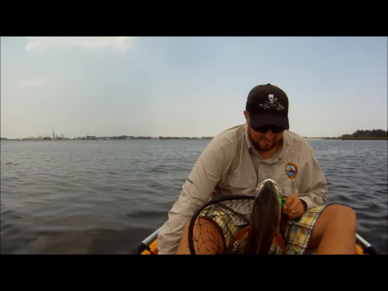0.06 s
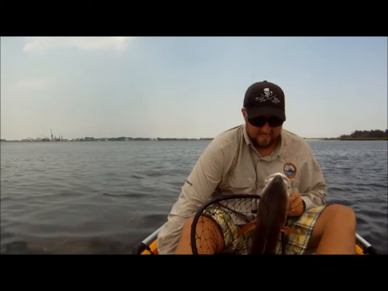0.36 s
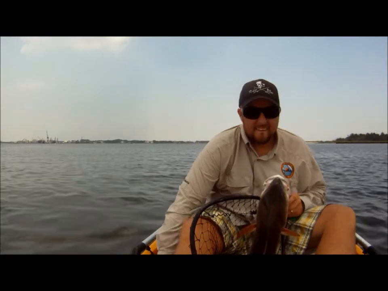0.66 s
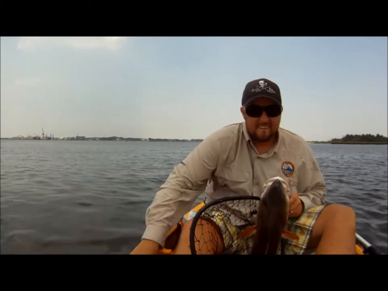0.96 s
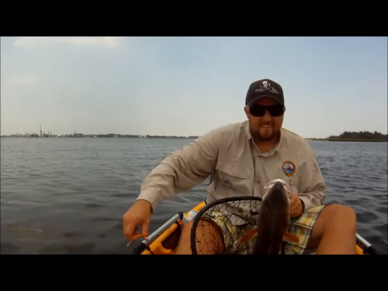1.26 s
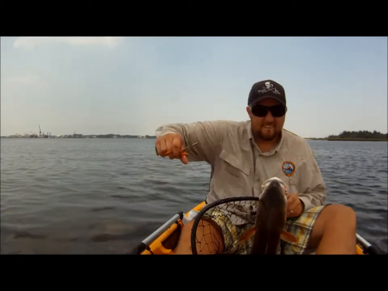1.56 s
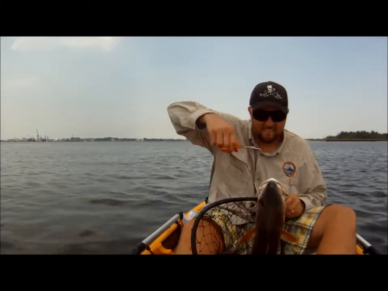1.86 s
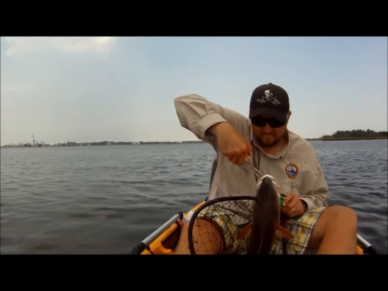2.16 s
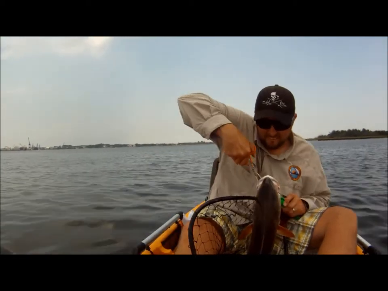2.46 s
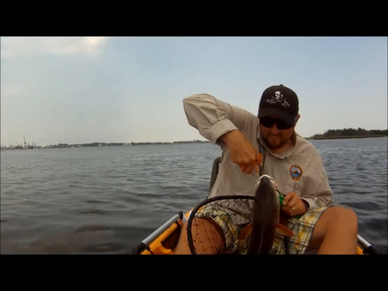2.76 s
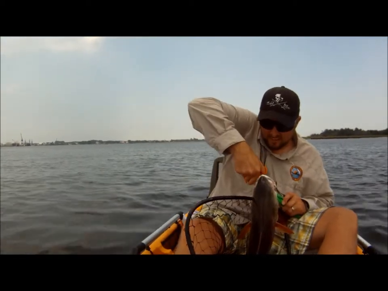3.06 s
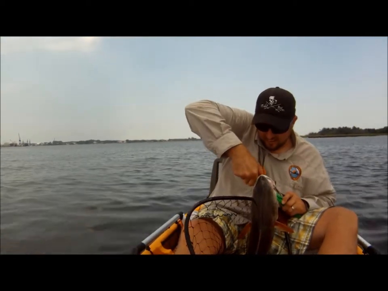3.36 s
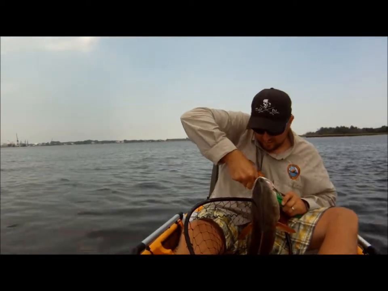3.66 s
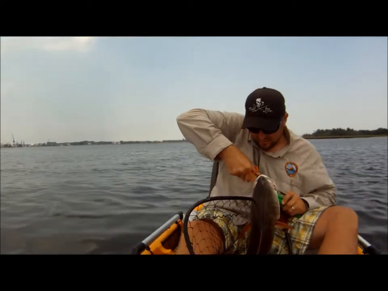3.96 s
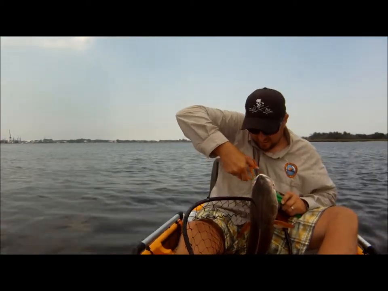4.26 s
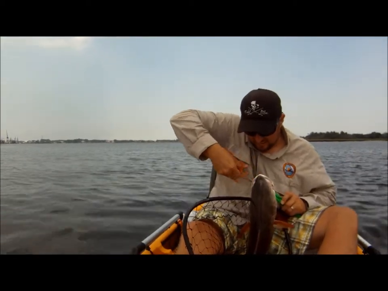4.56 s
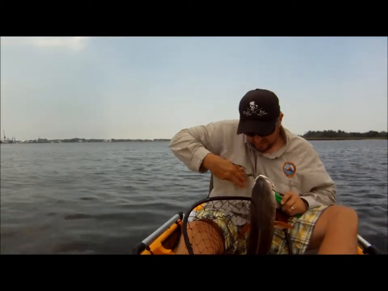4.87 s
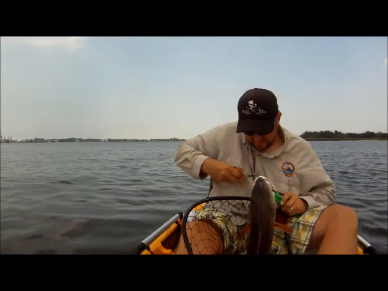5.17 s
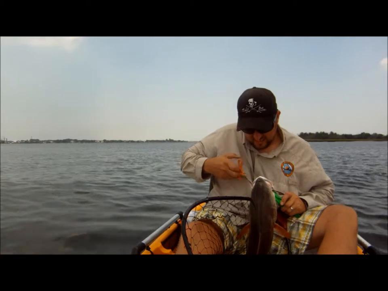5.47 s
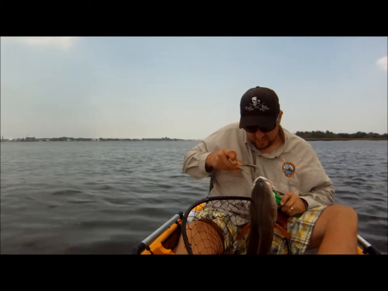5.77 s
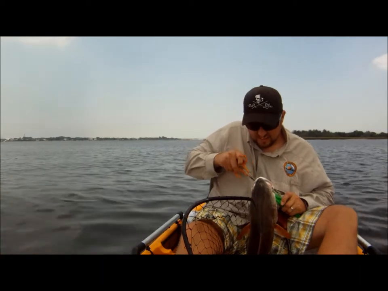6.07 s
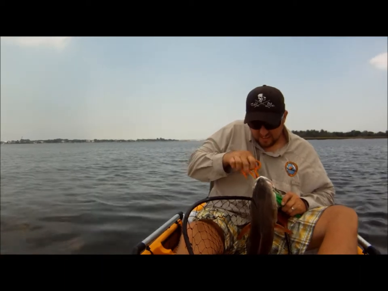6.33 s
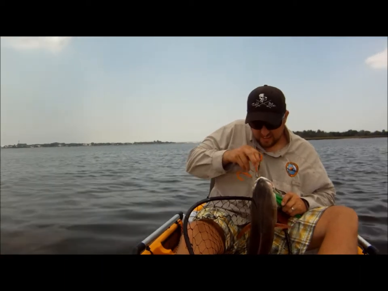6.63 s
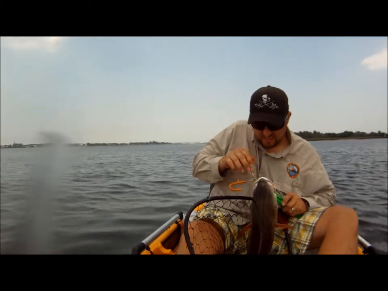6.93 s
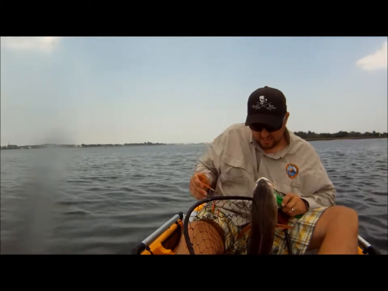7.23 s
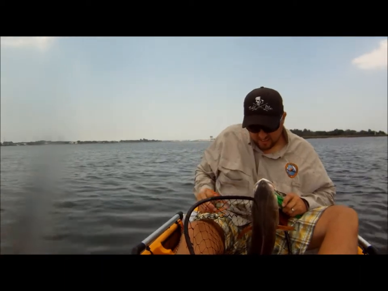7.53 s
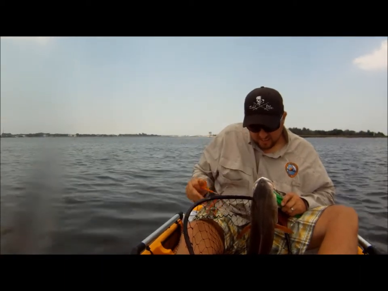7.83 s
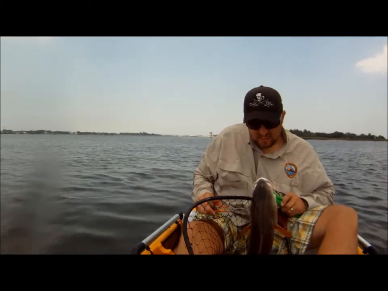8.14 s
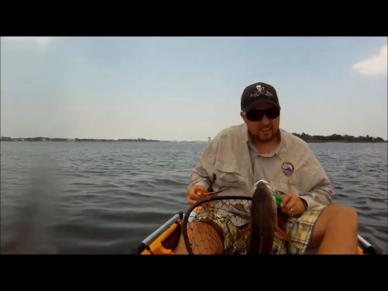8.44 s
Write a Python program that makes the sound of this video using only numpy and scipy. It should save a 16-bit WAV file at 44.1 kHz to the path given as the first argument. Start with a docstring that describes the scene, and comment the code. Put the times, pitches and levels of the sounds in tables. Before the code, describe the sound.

Low wind rumble and gently lapping water run throughout, with a faint rustle of wet net and sleeves close to the microphone. In the first second, gear scuffs dully against a plastic kayak, with thin scratches and brief swells of rumble. Sharp, hollow hull knocks and a tackle click cluster between 0.6 and 1.2 seconds, the loudest knock at 1 second. Soft bumps follow from about 2 to 3 seconds, among faint ticks of a hook being worked. A knock comes at 4.4 seconds and a sharp click at 4.8, then more small ticks. Two clicks and a strong knock land around 7.8 to 8 seconds, followed by soft bumps near 8.4. From about 1 second on, distant birds faintly trade quick trills, short falling notes and chirps. The handling sounds are dry, with a slightly glassy top.

```python
"""Open water, aboard a plastic kayak: a small camera's microphone sits close to an angler unhooking a fish.
Close up and dry, wet net rustles, gear scuffs and rocks the boat, soft bumps come through it,
the hollow hull knocks and tackle clicks. Wind rumbles and ripples lap underneath.
Farther off, birds trade two trilled phrases, with short falling notes between them and a distant chirp.
The camera holds each sample of a slow converter, which adds a glassy top."""
import sys
import numpy as np
from scipy import signal
from scipy.fft import rfft, irfft, next_fast_len
from scipy.io import wavfile
from scipy.ndimage import uniform_filter1d

SR = 44100
rng = np.random.default_rng(int(sys.argv[2]) if len(sys.argv) > 2 else 0)


def to_wav(s):
    """Save 16-bit WAV."""
    ch = np.atleast_2d(s).T  # columns
    pcm = np.round(np.clip(ch, -1, 1) * 32767)  # PCM
    wavfile.write(sys.argv[1], SR, pcm.astype(np.int16))


N = 379260

# Levels are relative within each table; ring_factor stretches a mode's t60_s.
# spectrum of wind and water: frequency_hz, level_db
AIR_SPECTRUM = [(15, -58), (25, -2.5), (76, 3), (143, -2), (183, -1.5), (230, -6.5), (637, -17.5),
                (764, -24), (1120, -37), (1440, -39), (1580, -29), (1760, -32), (2480, -49), (3330, -40),
                (5600, -41), (7280, -89), (12300, -120)]
# hollow hull ringing under the ripples: pitch_hz, width_hz, level_db
HULL_HUM = [(76, 38, -55.5), (175.1, 14, -53.5), (533, 109, -59), (1112, 53, -72)]
# rise and fall of the rustle of wet net and sleeves: time_s, level_db
RUSTLE_LEVELS = [(0.0, -58.5), (0.45, -59.5), (0.55, -65), (1.8, -65.5), (3.62, -65.5), (3.74, -66),
                 (4.14, -68), (4.43, -66), (4.81, -68), (5.53, -67.5), (5.8, -66.5), (6.25, -68.5),
                 (6.52, -64), (7.54, -69), (7.91, -66), (8.6, -66)]
# net, hook and line scratching: start_s, level_db, centre_hz, decay_s
LINE_SCRATCHES = [(0.061, -36.5, 1910, 0.0076), (0.096, -35, 2800, 0.003), (0.5708, -22, 2150, 0.0058),
                  (0.74, -33.5, 1960, 0.006), (2.055, -41.5, 1400, 0.0062), (2.101, -42.5, 591, 0.028),
                  (2.868, -45, 2610, 0.037), (3.828, -41.5, 2190, 0.0028), (8.29, -46, 2140, .006),
                  (8.472, -45, 2830, 0.006)]
# net and clothes scuffing the boat: start_s, level_db, centre_hz, decay_s
BOAT_SCUFFS = [(0.077, -20, 398, 0.0087), (0.093, -14, 191, 0.011), (0.115, -24, 214, 0.02),
               (0.197, -28, 338, .016), (0.455, -23, 590, 0.0085), (0.571, -23, 600, .008),
               (0.594, -16, 440, 0.01), (0.857, -26, 173, 0.011), (0.883, -16.5, 257, 0.012)]
# soft bumps through the boat: start_s, level_db
BOAT_BUMPS = [(0.276, -24), (1.152, -25), (1.915, -25.5), (2.473, -25.5), (2.523, -26), (2.83, -25.5),
              (3.059, -27.5), (8.352, -27.5), (8.412, -27), (8.475, -28.5)]
# knocks on the hull, the one at 0.808 s a plop of water against it, and clicks of hook, lure and grip: start_s,
# level_db, centre_hz, ring_factor
HULL_KNOCKS = [(0.5748, -10, 920, 1.15), (0.5945, -12, 430, 0.43), (0.808, -20.5, 920, 1.13),
               (1.0122, -0.5, 1026, 0.93), (1.0394, -17, 760, 0.89), (1.1892, -7, 1360, 0.66),
               (1.2096, -17.5, 1300, 1.1), (1.225, -22, 1160, 1.1), (4.4357, -13.5, 726, 0.93),
               (7.9222, -7.5, 1290, 0.71)]
TACKLE_CLICKS = [(0.8982, -12.5, 3460, 0.77), (1.1235, -37, 2500, .9), (1.6432, -38, 2250, 0.57),
                 (2.165, -34.5, 2920, 0.48), (2.3937, -41, 2140, 1), (3.021, -41, 2230, .9),
                 (3.6713, -38.5, 2990, .9), (4.795, -9, 3020, 0.93), (5.0544, -37, 2160, 1),
                 (5.0996, -28, 2140, 1), (5.879, -41, 2530, .9), (6.0008, -41, 3020, 1),
                 (6.5337, -33.5, 2700, 0.49), (6.6726, -36, 2200, .9), (6.7917, -36.5, 2300, 1),
                 (6.8745, -35.5, 2740, 1), (6.9357, -36, 1900, 1), (7.725, -35, 2400, 1),
                 (7.7744, -17, 3570, 0.55), (8.0196, -22.5, 3700, 0.87)]
# modes of the hull and of the tackle: pitch_hz, level_db, t60_s
HULL_MODES = [(440, -15, .05), (550, -15, .05), (625, -3, .058), (845, -10, .04), (965, -14, .04),
              (1135, 0, .034), (1545, -1, .019), (1880, -3, .011), (2120, -1, .011), (2400, 0, .012),
              (3700, -11, .01), (4700, -19, .009)]
TACKLE_MODES = [(1280, -9, .018), (1884, -9, .016), (2470, 2, .019), (2700, -4, .014), (3040, -1, .016),
                (3440, 0, .017), (3860, -4, .018), (4400, -8, .012), (4950, -7, .012)]
# spells of finger work at the hook: start_s, end_s
HOOK_SPELLS = [(2.05, 2.95), (3.1, 4.0), (5.9, 7.2)]
# a distant bird's repeated chirp: start_s, level_db
FAR_CHIRPS = [(0.95, -65), (3.8, -69), (4.985, -64), (5.135, -63.5), (6.12, -72), (6.93, -68), (7.075, -68),
              (7.265, -73)]
# short bird notes between the phrases: start_s, length_s, level_db, pitch_hz
BIRD_NOTES = [(1.82, .045, -50.5, 2780), (2.277, 0.035, -51.5, 2660), (2.514, 0.034, -51.5, 2040),
              (3.624, 0.03, -51, 2070), (4.05, 0.029, -54, 1950), (4.175, 0.04, -55.5, 1480),
              (5.116, 0.053, -51, 2220), (5.24, 0.043, -46, 1820), (8.094, .14, -55, 2770),
              (8.177, 0.063, -56, 2070)]
# course of each phrase: share_of_length, pitch_hz, level_db, trill_depth
LOW_PHRASE = [(0, 2260, -12, 1), (.13, 2188, -3.5, 0.83), (.38, 2100, 1, 0.83), (.54, 1886, -5.5, 0.84),
              (.67, 1840, -1, 1), (.8, 2020, -1, 0), (.89, 2160, -6.5, .1), (1, 2070, -9, 0.3)]  # a sinking trill that rises into a held note
HIGH_PHRASE = [(0, 3018, 14.5, .9), (.09, 2942, 7, .82), (.28, 2906, 0, 0.73), (.62, 2918, 3.5, 0.95),
               (.77, 3004, 5.5, .5), (.87, 2760, 0.5, 0.15), (1, 2630, 1.5, .1)]  # a level trill that ends in a falling note
# calls on each phrase: start_s, length_s, level_db, pitch_factor
LOW_BIRD_CALLS = [(1.06, .36, -40.5, 1.0), (1.975, .335, -43, 0.992), (3.22, .36, -43.5, 0.97),
                  (4.285, 0.36, -47, 1.023), (5.49, .35, -46, 1), (6.41, .335, -47, 1.003),
                  (7.59, 0.36, -49.5, 0.98)]
HIGH_BIRD_CALLS = [(1.415, .37, -54.5, 1), (1.862, 0.12, -59, 1.14), (2.55, 0.37, -57.5, 1.0),
                   (3.66, 0.41, -55, 1), (5.17, .31, -58.5, 1.026), (6.42, .33, -64, .98),
                   (8.24, .28, -65, .98)]


def undb(db):
    """Decibels to gain."""
    return 10 ** (np.asarray(db) / 20)


def unit(x):
    """Scale to rms 1."""
    return x / np.sqrt(np.mean(x ** 2))


def add(out, start_s, sound):
    """Mix a sound in at a time."""
    i = max(int(start_s * SR), 0)
    out[i:i + len(sound)] += sound[:N - i]


def band(x, hz, width_hz):
    """One resonance, gain 1 at its centre."""
    return signal.lfilter(*signal.iirpeak(hz, hz / width_hz, fs=SR), x)


def noise_band(size, hz, width_hz):
    """Noise passed twice through one resonance, at rms 1."""
    return unit(band(band(rng.standard_normal(size), hz, width_hz), hz, width_hz))


def colour(x, gain_at):
    """Filter by a gain given as a function of frequency."""
    size = next_fast_len(len(x) + 2048)
    hz = np.arange(size // 2 + 1) * SR / size + 0.0011  # the offset avoids log(0)
    return irfft(rfft(x, size) * gain_at(hz), size)[:len(x)]


def walk(rate_hz):
    """Smooth random drift with a spread near 1."""
    hold = int(SR / rate_hz)
    steps = np.repeat(rng.standard_normal(N // hold + 1), hold)
    return 1.3 * uniform_filter1d(uniform_filter1d(steps, hold), hold)[:N]


def whistle(hz):
    """A sine that follows a pitch curve."""
    return np.sin(2 * np.pi * np.cumsum(hz) / SR)


def wind_and_water(rocking_db, level_db=-44, flicker_db=1.65, rumble_hz=110):
    """Low wind and lapping flicker octave by octave; the rumble swells as the boat rocks."""
    air_hz, air_db = np.transpose(AIR_SPECTRUM)
    out = np.zeros(N)
    for centre_hz in 30 * 2. ** np.arange(9):
        def octave(hz):
            window = np.sqrt(np.maximum(1 - np.abs(np.log2(hz / centre_hz)), 0))
            return window * undb(np.interp(np.log(hz), np.log(air_hz), air_db))
        lap_db = flicker_db * walk(18) / (1 + centre_hz / 1500)  # the distant hiss stays smooth
        rumble_db = rocking_db / (1 + (np.log2(centre_hz / rumble_hz) / 2.5) ** 2)
        out += colour(rng.standard_normal(N), octave) * undb(lap_db + rumble_db)
    return unit(out) * undb(level_db)


def hull_hum(rocking_db, drift_db=1.5):
    """The hollow hull hums along under the ripples, louder as it rocks."""
    hum = sum(undb(db + drift_db * walk(3.9)) * noise_band(N, hz, width_hz) for hz, width_hz, db in HULL_HUM)
    return hum * undb(rocking_db)


def rocking(strength_db=24, spread_s=0.038):
    """Rise of the rumble in dB: the boat rocks around each scuff, the more the harder it is."""
    t = np.arange(N) / SR
    power = sum(undb(db + strength_db) ** 2 * np.exp(-np.abs(t - start_s) / spread_s)
                for start_s, db, _, _ in BOAT_SCUFFS)
    return 10 * np.log10(1 + power)


def rustle(ticks_per_s=70, spread_db=3, tick_s=0.0026, gain_db=5.5):
    """Wet mesh and cloth near the microphone: a soft hiss and many tiny ticks of unequal size."""
    onsets = rng.random(N) < ticks_per_s / SR
    sizes = undb(spread_db * np.minimum(rng.exponential(size=N), 3))
    fades = signal.lfilter([1], [1, -np.exp(-1 / (tick_s * SR))], onsets * sizes)
    ticks = unit(fades * rng.standard_normal(N))
    friction = undb(-1) * ticks + rng.standard_normal(N)
    mesh = band(band(friction, 2330, 1600), 1890, 2200) + undb(5.5) * band(friction, 1147, 460)
    level_db = np.interp(np.arange(N) / SR, *np.transpose(RUSTLE_LEVELS))
    return unit(mesh) * undb(level_db + gain_db)


def rub(hz, width_hz, rise_s, decay_s):
    """Rough contact noise around one pitch that swells quickly and dies away."""
    t = np.arange(int(.15 * SR)) / SR
    return noise_band(len(t), hz, width_hz) * (1 - np.exp(-t / rise_s)) * np.exp(-t / decay_s)


def scratches():
    """Net, hook and line scrape in thin, sharp bursts."""
    out = np.zeros(N)
    for start_s, db, hz, decay_s in LINE_SCRATCHES:
        add(out, start_s, undb(db) * rub(hz, 0.43 * hz, 0.00017, decay_s))
    return out


def scuffs(gain_db=-4, grit_db=-13.5):
    """Net and clothes drag on the boat: a dull rub with some grit above it."""
    out = np.zeros(N)
    for start_s, db, hz, decay_s in BOAT_SCUFFS:
        dull = rub(hz, 1.7 * hz, 0.0022, decay_s)
        grit = rub(2570, 1000, 0.0009, .5 * decay_s)
        add(out, start_s, undb(db + gain_db) * (dull + undb(grit_db) * grit))
    return out


def bumps(pitch_hz=206, push_s=0.00563, width_cycles=0.4, gain_db=2):
    """A soft push and rebound through the boat, little more than one cycle long."""
    out = np.zeros(N)
    cycles = pitch_hz * (np.arange(int(.03 * SR)) / SR - push_s)
    bump = np.sin(2 * np.pi * cycles) * np.exp(-(cycles / width_cycles) ** 2)
    for start_s, db in BOAT_BUMPS:
        add(out, start_s, undb(db + gain_db) * bump)
    return out


def strikes(blows, modes, reach_octaves, crack_db, crack_s, contact_s, travel_s, gain_db, low_cut_hz):
    """Each blow on hull or tackle rings the modes near its centre most, with a crack of contact noise."""
    out, t = np.zeros(N), np.arange(int(.12 * SR)) / SR
    hz, db, t60_s = np.array(modes).T[:, :, None]
    lag_s = travel_s * np.sqrt(hz[0] / hz)  # bending waves are slower at low pitch
    attack = (1 - np.exp(-t / contact_s)) ** 2
    for start_s, level_db, centre_hz, ring_factor in blows:
        spot_db = rng.uniform(-0.065, 1, db.shape)  # each blow lands on another spot
        weight = undb(db + spot_db) / (1 + (np.log2(hz / centre_hz) / reach_octaves) ** 2)
        fade = np.exp(-np.log(1000) * t / (t60_s * ring_factor))
        body = np.sum(weight * attack * fade * np.cos(2 * np.pi * hz * (t - lag_s)), axis=0)
        body /= np.std(body[t < .004])
        crack = unit(band(rng.standard_normal(len(t)), centre_hz, centre_hz)) * np.exp(-t / crack_s)
        add(out, start_s, undb(level_db + gain_db) * (body + undb(crack_db) * crack))
    # a small vibrating part gives off little sound below its first modes
    return signal.sosfilt(signal.butter(3, low_cut_hz, "highpass", fs=SR, output="sos"), out)


def bird_notes(waver_hz=35, note_fall=0.046, chirp_hz=4590, chirp_s=.11, chirp_fall=.21):
    """Thin notes and distant chirps arch slightly, then fall by a share of their starting pitch."""
    out, waver = np.zeros(N), waver_hz * walk(300)
    notes = [(*note, note_fall) for note in BIRD_NOTES]
    chirps = [(start_s, chirp_s, db, chirp_hz, chirp_fall) for start_s, db in FAR_CHIRPS]
    for start_s, length_s, db, start_hz, fall in notes + chirps:
        share = np.linspace(0, 1, int(length_s * SR))
        arch_hz = start_hz * (1 - fall * share * (2 * share - 1))
        hz = arch_hz + waver[int(start_s * SR):][:len(share)]
        add(out, start_s, undb(db) * whistle(hz) * signal.windows.tukey(len(hz), .5))
    return out


def bird_trills(calls, phrase, trill_hz, slide_hz, waver_hz, flutter_db, upper_ratio, upper_db):
    """A bird across the water chops a whistle into quick sliding syllables, a fainter tone above it."""
    out, phrase = np.zeros(N), np.array(phrase)
    waver, flutter, haste, upper_waver = walk(300), walk(40), walk(19), walk(500)
    for start_s, length_s, db, pitch_factor in calls:
        share = np.linspace(0, 1, int(length_s * SR))
        here = np.minimum(int(start_s * SR) + np.arange(len(share)), N - 1)
        phrase_hz, phrase_db, depth = (np.interp(share, phrase[:, 0], column) for column in phrase.T[1:])
        syllable_phase = np.cumsum(trill_hz * (1 + 0.058 * haste[here])) / SR % 1
        syllables = np.clip(2 * np.sin(np.pi * syllable_phase) ** 2 - .4, 0, 1)
        gate = (1 - depth * (1 - syllables)) * signal.windows.tukey(len(share), .05)
        hz = phrase_hz * pitch_factor + slide_hz * depth * (syllable_phase - .5) + waver_hz * waver[here]
        upper_hz = upper_ratio * hz + 3 * waver_hz * upper_waver[here]
        tone = whistle(hz) + undb(upper_db) * whistle(upper_hz)
        add(out, start_s, undb(db + phrase_db + flutter_db * flutter[here]) * gate * tone)
    return out


def hook_clicks(per_spell=7, level_db=-43, spread_db=2, centre_hz=2360, ring_factor=0.82):
    """Fingers at the hook make faint clicks by chance, as rows like those of TACKLE_CLICKS."""
    rows = []
    for start_s, end_s in HOOK_SPELLS:
        for when, force, spot in rng.uniform(-1, 1, (per_spell, 3)):
            click_s = start_s + (end_s - start_s) * (when + 1) / 2
            rows.append((click_s, level_db + spread_db * force, centre_hz * 2 ** (spot / 2), ring_factor))
    return rows


def scene():
    """What reaches the microphone, mono and dry: close handling, faint birds, wind and water."""
    knocks = strikes(HULL_KNOCKS, HULL_MODES, reach_octaves=0.68, crack_db=-19, crack_s=0.0035,
                     contact_s=0.0003, travel_s=0.001725, gain_db=-8, low_cut_hz=410)
    clicks = strikes(TACKLE_CLICKS + hook_clicks(), TACKLE_MODES, reach_octaves=0.5, crack_db=3,
                     crack_s=0.0024, contact_s=0.00031, travel_s=0.001416, gain_db=-8.5, low_cut_hz=680)
    low_bird = bird_trills(LOW_BIRD_CALLS, LOW_PHRASE, trill_hz=42.46, slide_hz=-140, waver_hz=52,
                           flutter_db=3.5, upper_ratio=1.53, upper_db=-16.5)
    high_bird = bird_trills(HIGH_BIRD_CALLS, HIGH_PHRASE, trill_hz=35.2, slide_hz=342, waver_hz=36.5,
                            flutter_db=0.9, upper_ratio=2, upper_db=-16)
    handling = knocks + clicks + scuffs() + scratches() + bumps() + rustle()
    birds = low_bird + high_bird + bird_notes()
    rocking_db = rocking()
    return (handling + birds + wind_and_water(rocking_db) + hull_hum(rocking_db))[None]


def record(dry, converter_hz=12000, top_hz=15300):
    """The camera keeps the band under half its converter's rate; held samples mirror it into the treble."""
    rounded = np.arctan(dry[0])  # the microphone rounds the hardest knocks
    narrow = signal.sosfilt(signal.butter(14, .46 * converter_hz, fs=SR, output="sos"), rounded)
    mirrored = narrow * (1 + 2 * np.cos(2 * np.pi * converter_hz * np.arange(N) / SR))
    held = colour(mirrored, lambda hz: np.sinc(hz / converter_hz))
    return signal.sosfilt(signal.ellip(10, .2, 80, top_hz, fs=SR, output="sos"), held)[None]


dry = scene()
out = record(dry)
to_wav(out)
```